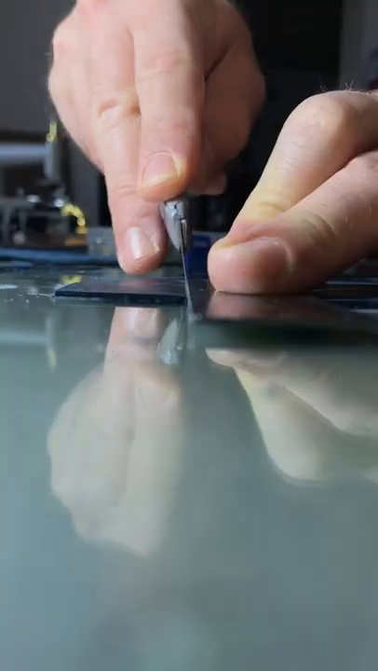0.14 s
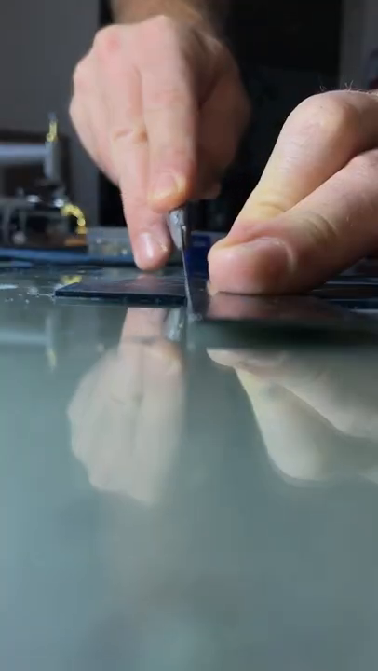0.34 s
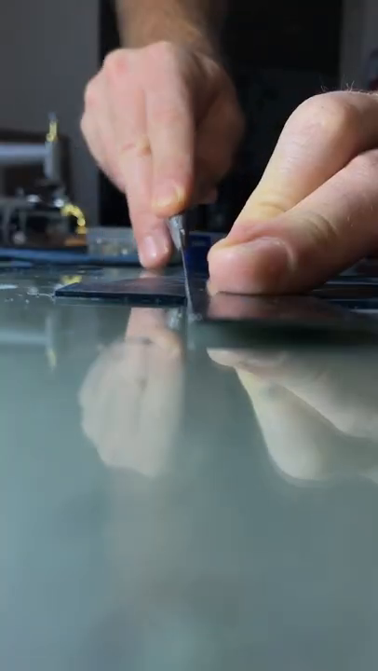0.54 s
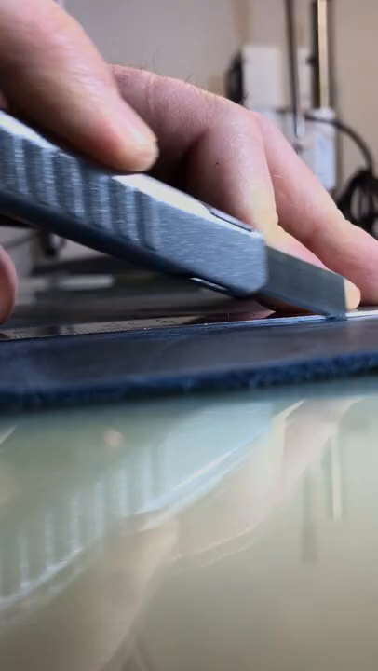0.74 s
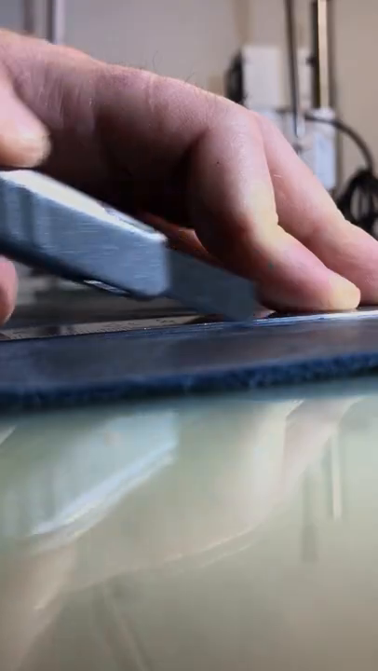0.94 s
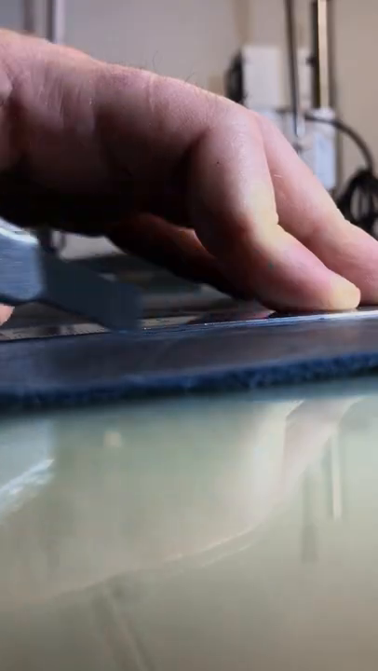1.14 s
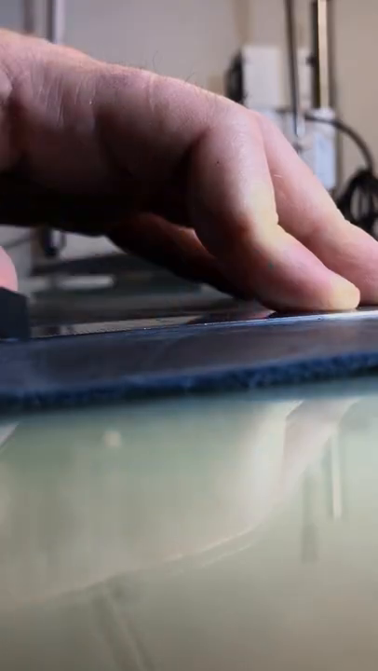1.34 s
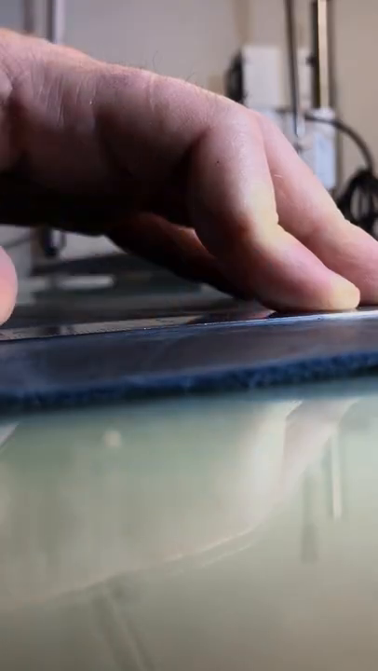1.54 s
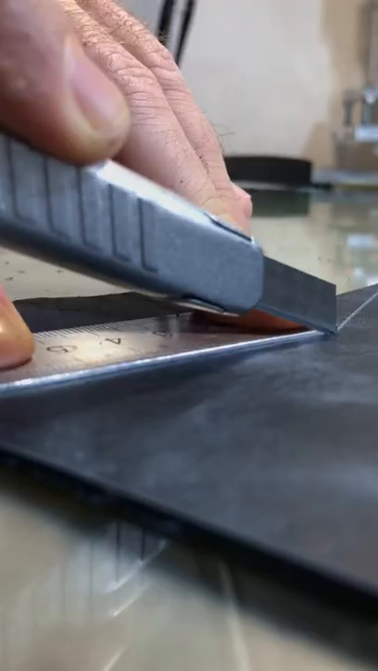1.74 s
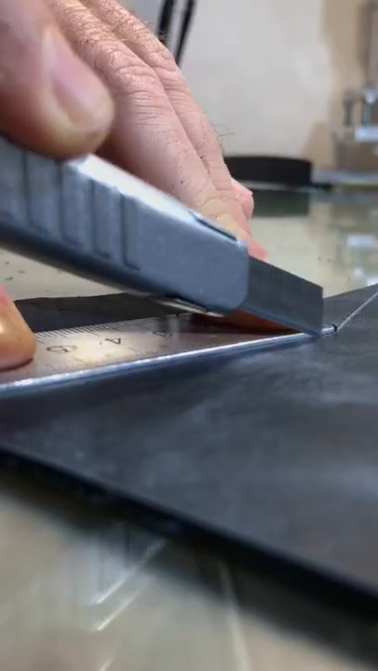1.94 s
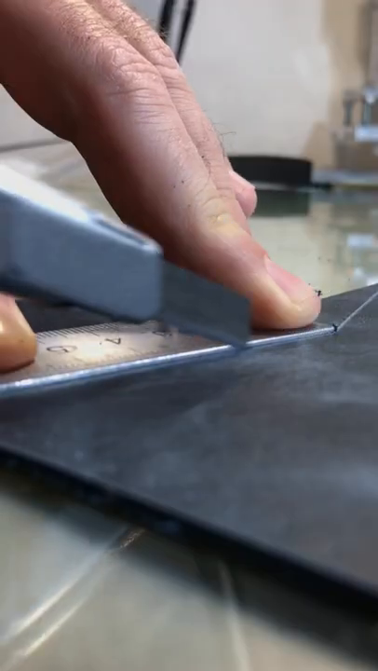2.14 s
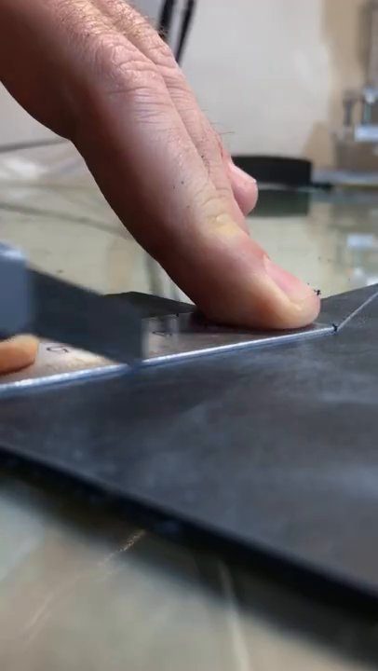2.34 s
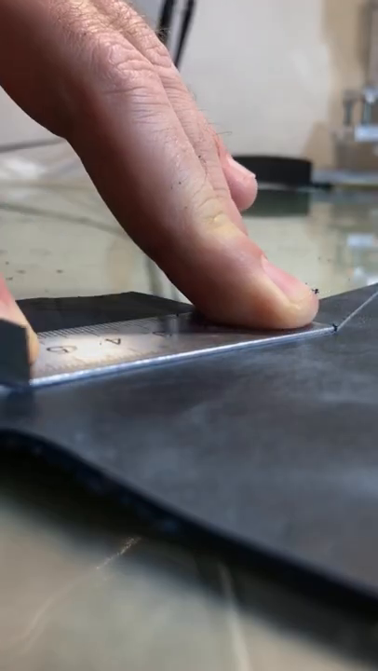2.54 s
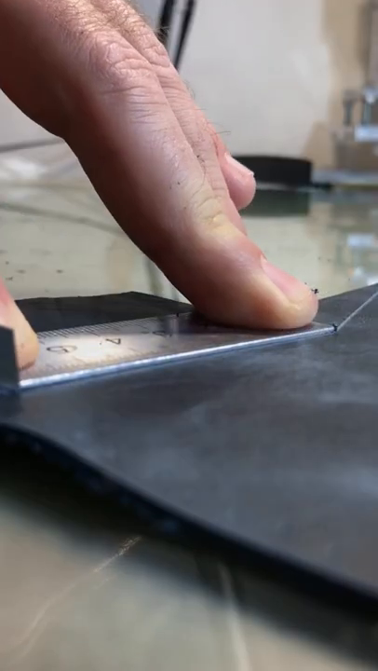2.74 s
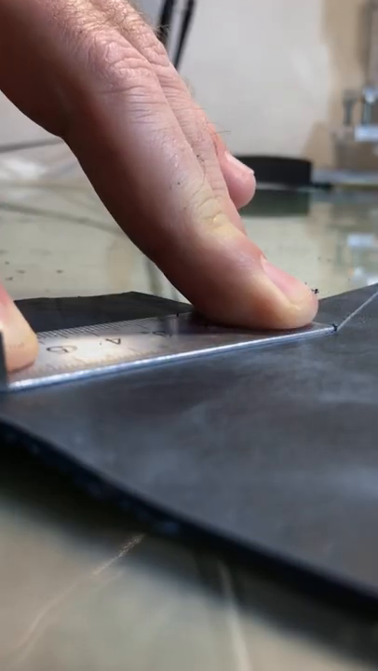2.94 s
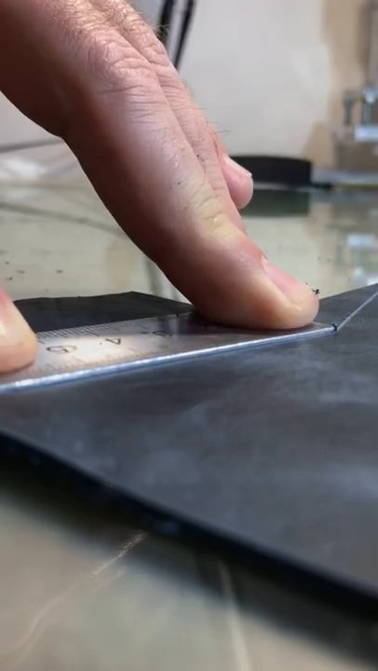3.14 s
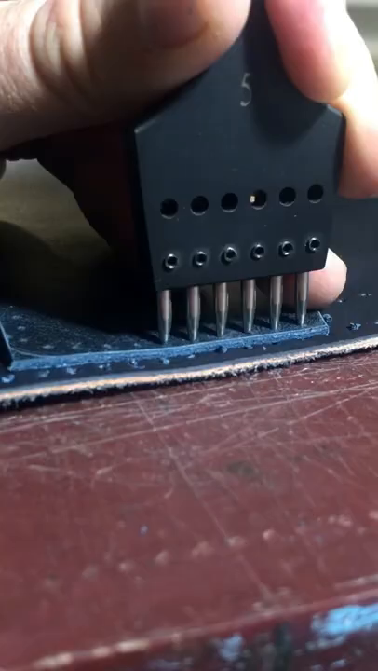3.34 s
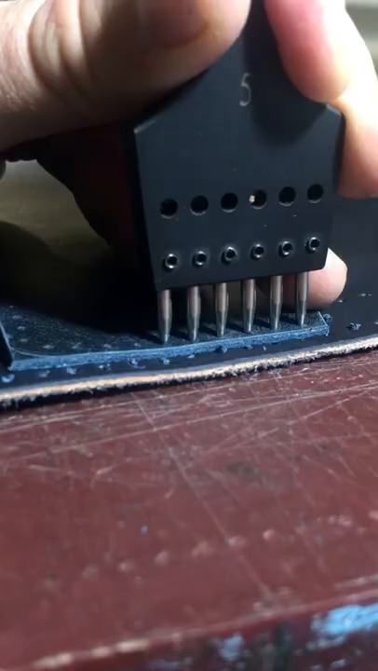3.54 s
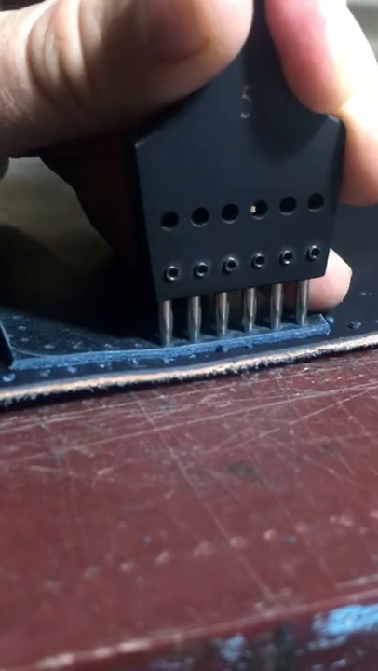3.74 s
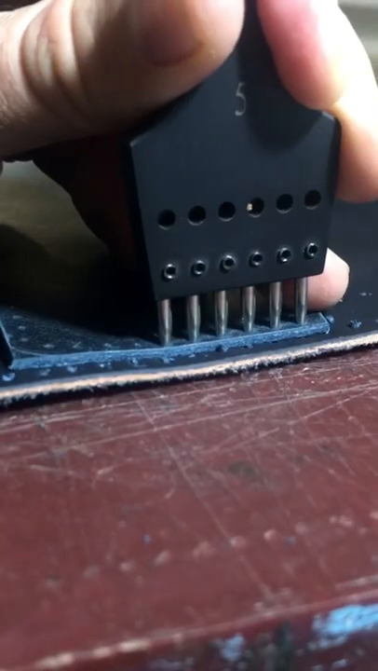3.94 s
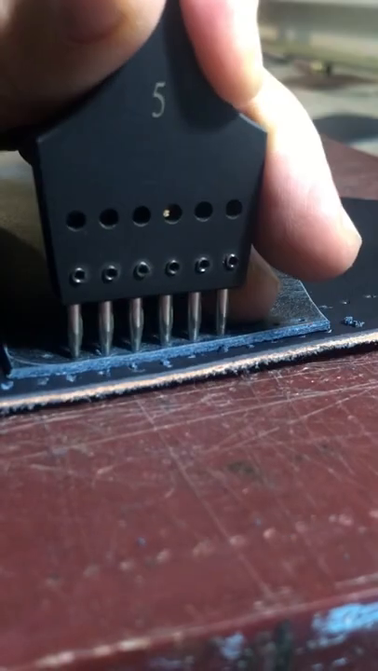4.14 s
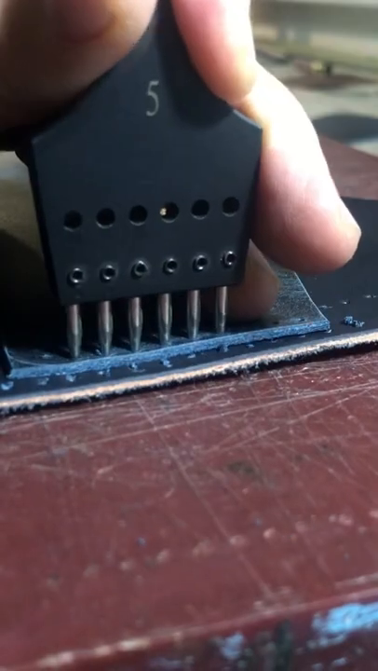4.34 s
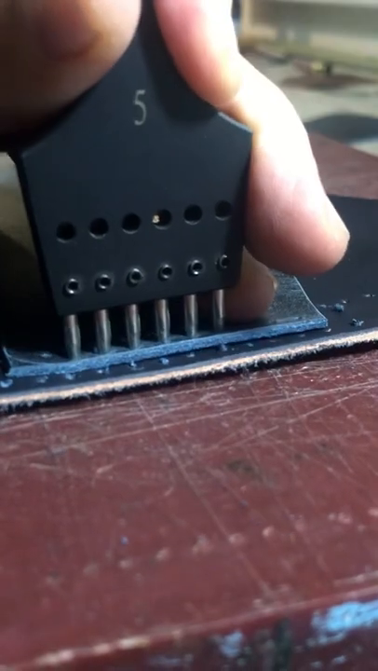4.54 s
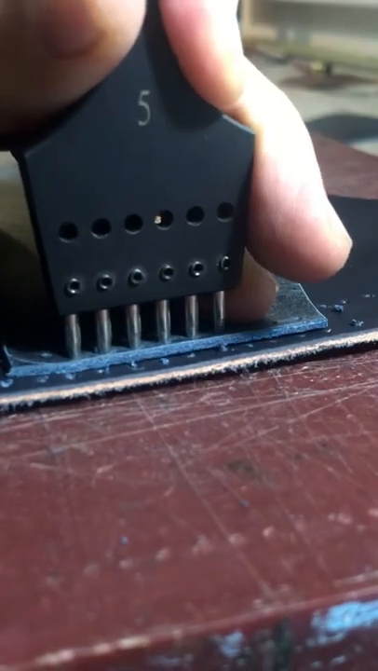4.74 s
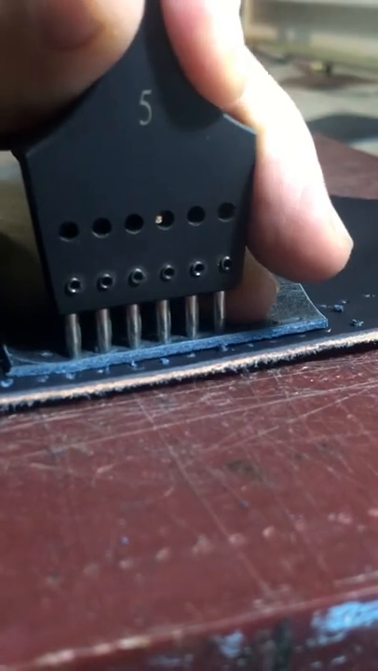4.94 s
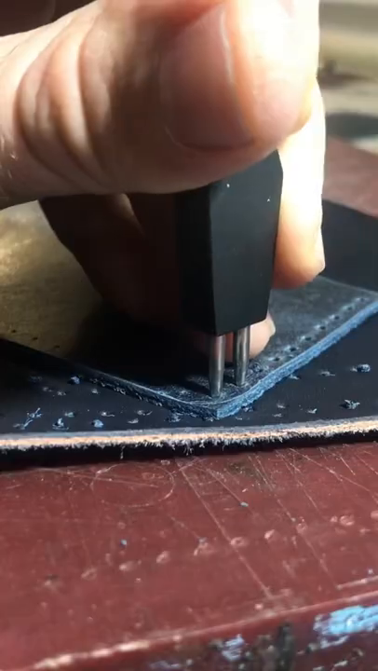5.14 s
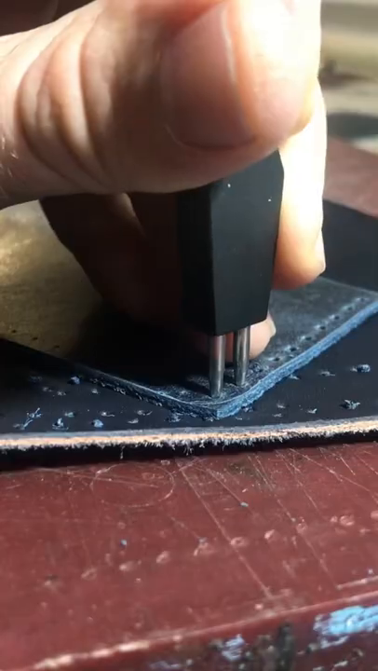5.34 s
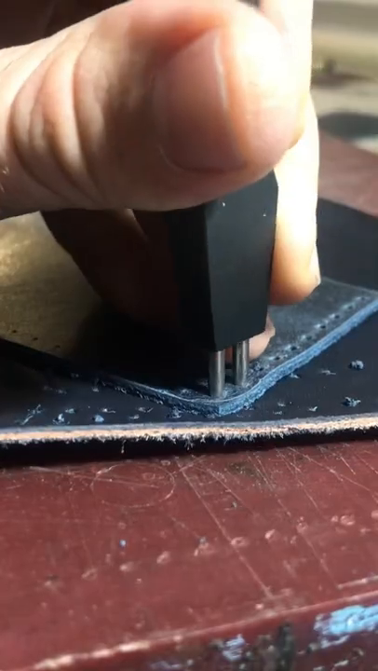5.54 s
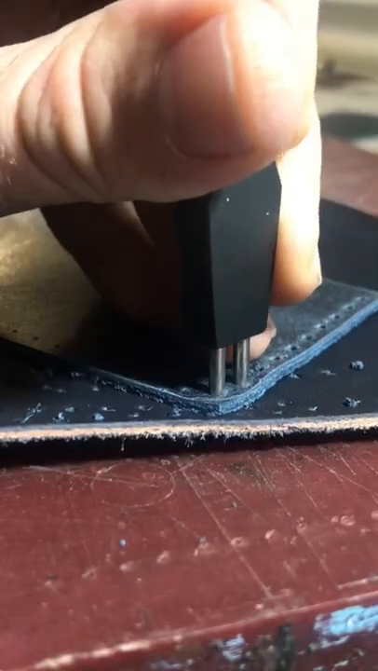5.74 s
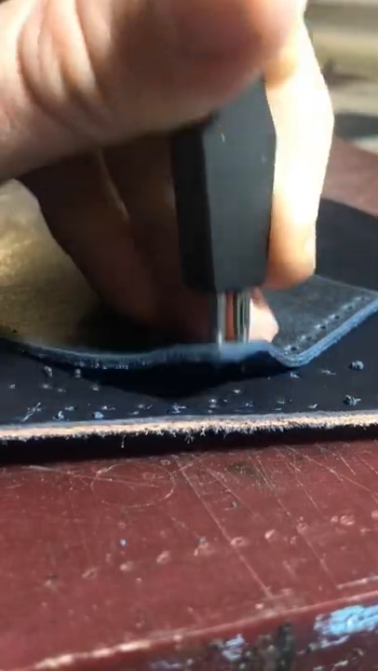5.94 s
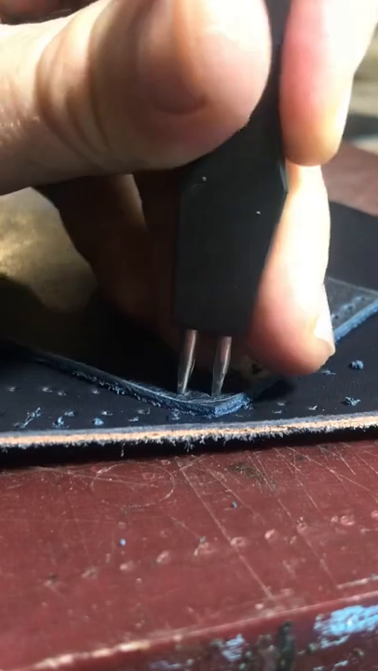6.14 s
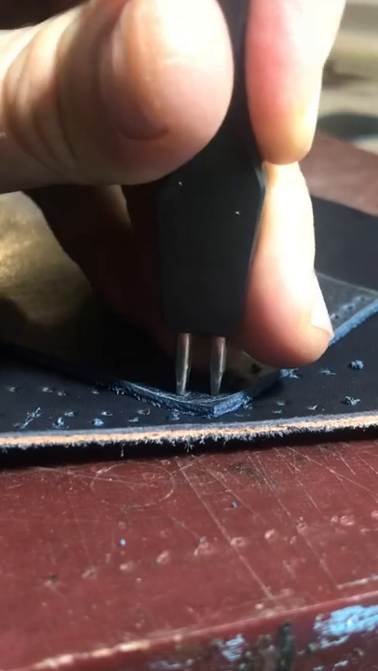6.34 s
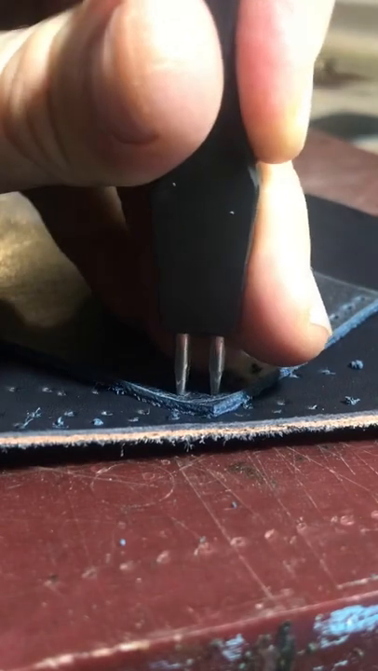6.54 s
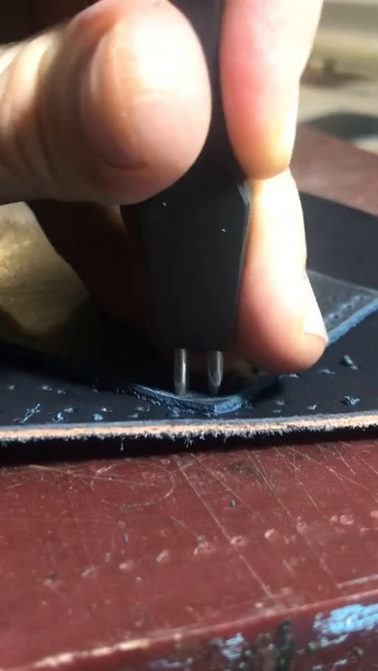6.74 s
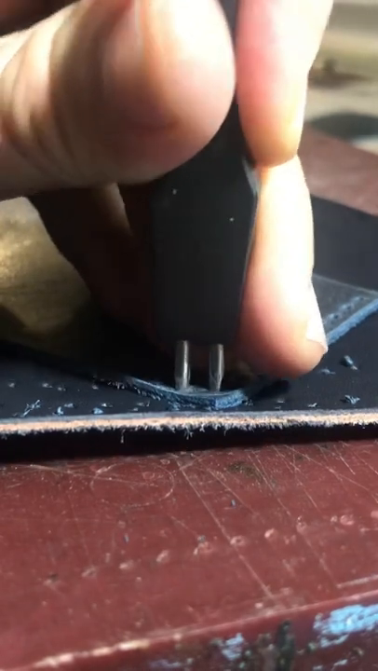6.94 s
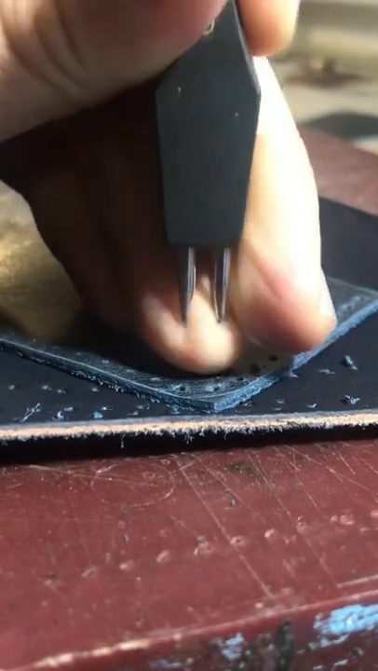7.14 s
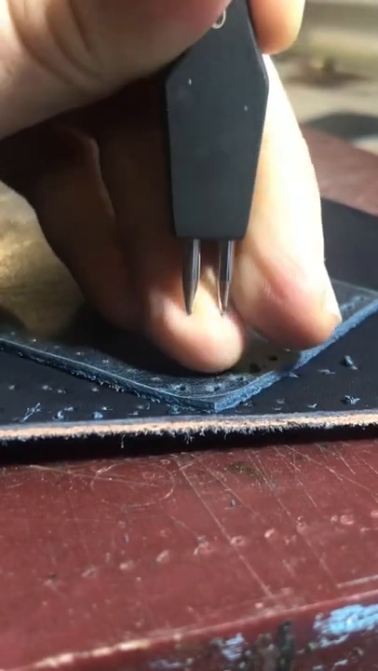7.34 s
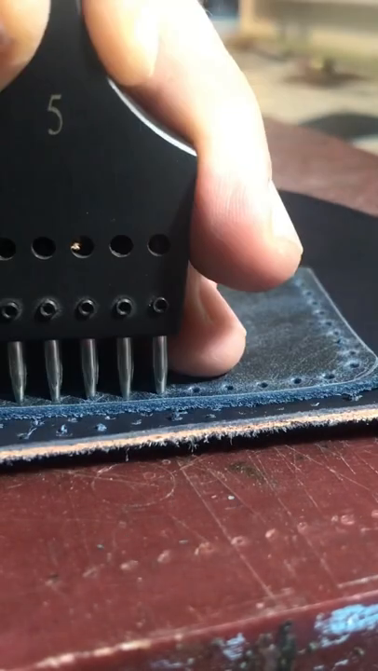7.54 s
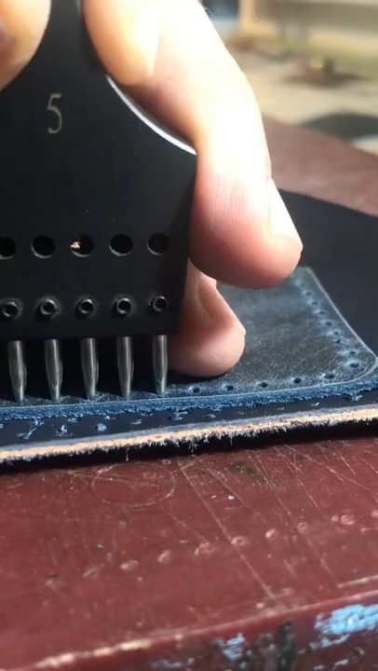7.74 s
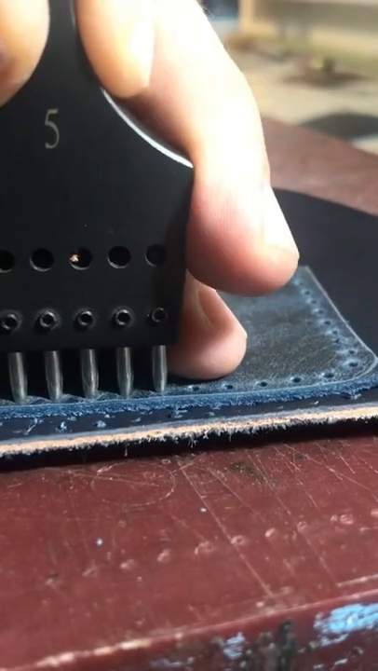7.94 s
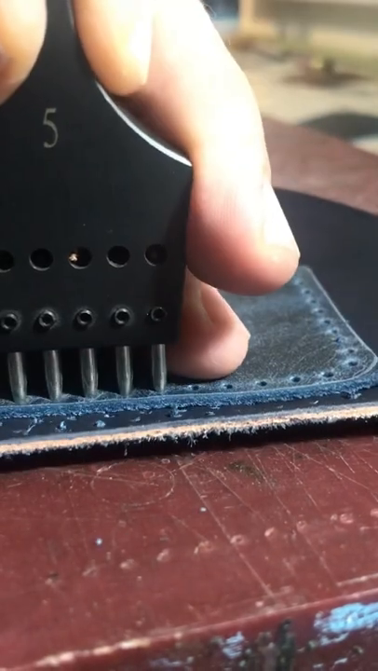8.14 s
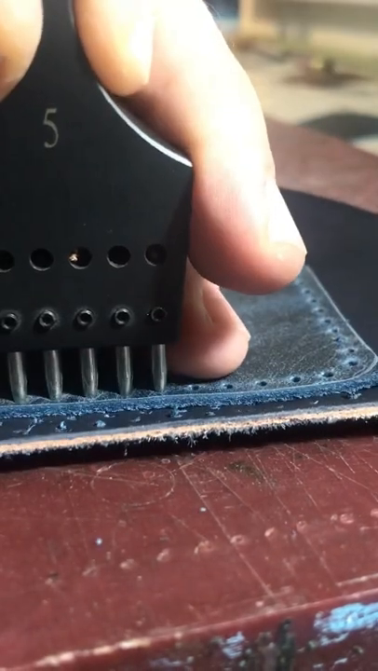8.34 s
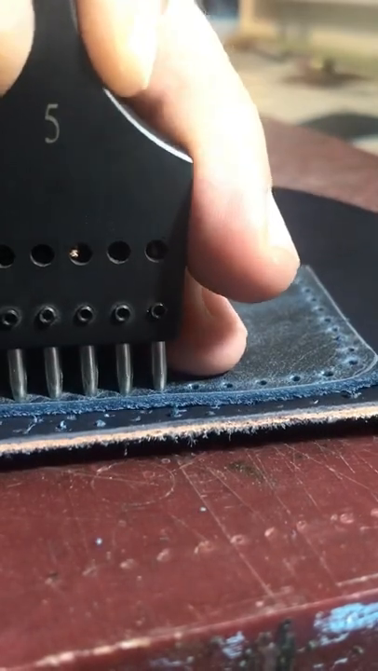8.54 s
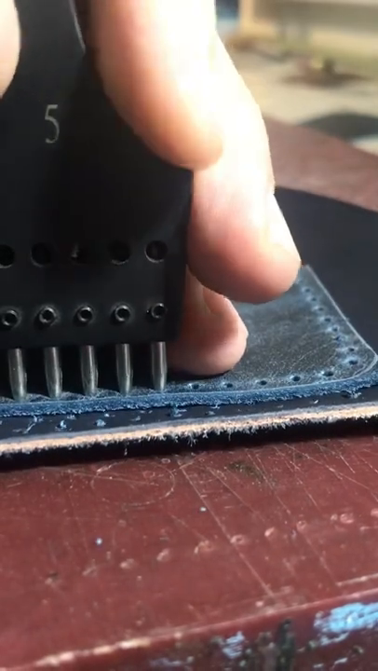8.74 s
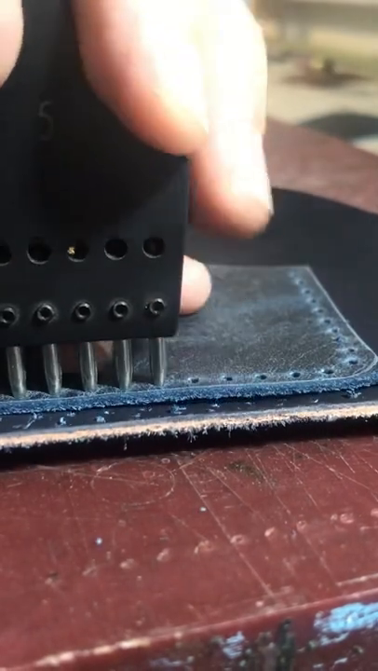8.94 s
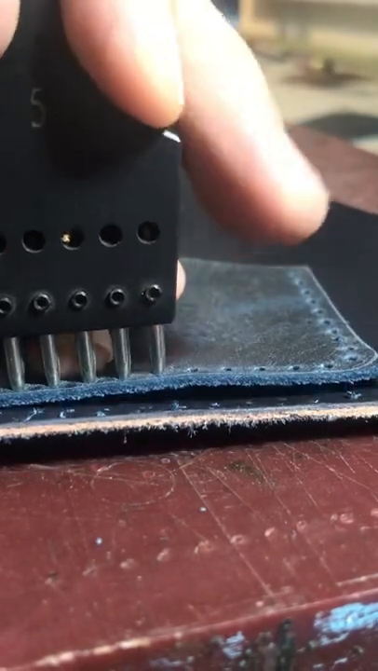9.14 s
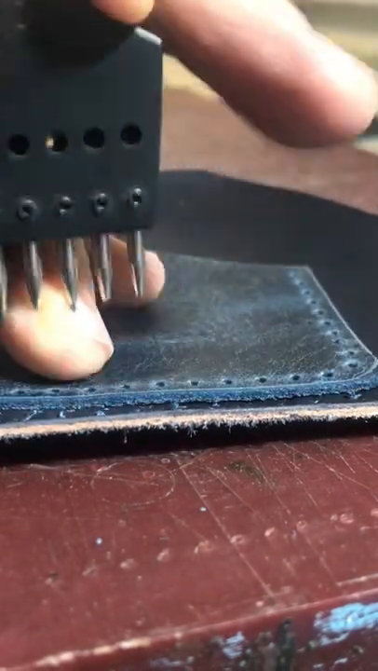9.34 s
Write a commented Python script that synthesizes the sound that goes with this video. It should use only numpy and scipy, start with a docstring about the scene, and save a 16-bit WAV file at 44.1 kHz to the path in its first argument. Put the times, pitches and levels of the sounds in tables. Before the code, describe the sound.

A close microphone in a small workshop, with faint hiss, low rumble and tiny ticks. From 0 to 0.6 s a knife rasps through leather along a steel ruler, with a sharp knock near 0.45 s. A second, brighter, hissier stroke runs from 0.6 to 1.6 s, with a faint low hum of rubbing near 1.2 s. After a brief lull, a third gritty scrape lasts from about 1.9 to 2.6 s. A hard clack follows at 3.0 s, then rustling and a quick double squeak at 3.2 s. Mallet blows on a pronged punch crack and clatter over a resonant wooden bench at 3.6, 4.4, 5.5, 6.7 and 7.8 s, the first two leaving a thin steel ring. Soft thuds and small metallic pops fall between blows, notably at 6.0 and 7.2 s. Echoes stop abruptly at edits. Light touches near 8.5-8.9 s precede a final soft pop at 9.3 s.

```python
"""A knife is drawn three times through leather along a steel ruler on a glass top: grains of snapping fibre
through drifting resonances. Then a mallet drives a pronged punch into leather on a wooden bench, five blows of
noise clatter over dying bench modes; the prongs pop free between them as short rings under a snap. A small
workshop, a close microphone: noise bursts, touches, a squeak, thuds, hums, ticks, whine, hiss, rumble. At a few
set moments the sound breaks off: the echoes and the ringing of the blows stop there, and a new stretch begins."""
import sys
import numpy as np
from scipy import signal
from scipy.fft import rfft, irfft, next_fast_len
from scipy.io import wavfile
from scipy.ndimage import uniform_filter1d

SR = 44100
rng = np.random.default_rng(int(sys.argv[2]) if len(sys.argv) > 2 else 0)


def transcribe(u):
    """Save the signal u as a 16-bit wav file named by the first command-line argument.

    u: samples, shape (n,) or (channels, n), limited to [-1, 1]; the rate is SR.
    q: integer samples, one column per channel.
    """
    v = np.clip(np.atleast_2d(u).T, -1, 1)
    q = np.round(v * 32767).astype(np.int16)
    wavfile.write(sys.argv[1], SR, q)


N = 414099


def amp(db):
    """Decibels to gain."""
    return 10 ** (np.asarray(db) / 20)


def evened(x):
    """Scales to rms 1."""
    return x / np.sqrt(np.mean(x ** 2) + 1e-20)


def smooth_noise(shape, *widths):
    """Slow noise of rms 1: white noise averaged over each width in turn."""
    noise = rng.standard_normal(shape)
    for axis, width in widths:
        noise = uniform_filter1d(noise, width, axis)
    return evened(noise)


def read(points, hz):
    """Reads a table of (pitch_hz, value) on a log-frequency axis."""
    f, value = np.transpose(points)
    return np.interp(np.log(hz + 1), np.log(f + 1), value)


def add(mix, start_s, sound):
    """Mixes a sound in at start_s, cut where the mix ends."""
    part = mix[round(start_s * SR):][:len(sound)]
    part += sound[:len(part)]


def colour(x, points):
    """Filters by a table of (pitch_hz, level_db)."""
    size = next_fast_len(len(x) + 2048)
    return irfft(rfft(x, size) * amp(read(points, np.fft.rfftfreq(size, 1 / SR))), size)[:len(x)]


def modes(table, seconds, waver_db=0):
    """Dying sines of random phase, each wavering in level."""
    t = np.arange(round(seconds * SR)) / SR
    knots = np.arange(0, seconds + .1, .035)
    total = np.zeros(len(t))
    for hz, db, t60 in table:
        waver = waver_db * np.interp(t, knots, rng.standard_normal(len(knots)))
        total += amp(db - 60 * t / t60 + waver) * np.sin(2 * np.pi * (hz * t + rng.random()))
    return total


def grit(count, spread_db, clump_db):
    """Dense grains of uneven size that come in clumps."""
    clumps = smooth_noise(count, (0, 250))
    sizes = np.minimum(rng.exponential(1, count), 5)
    return evened(rng.standard_normal(count) * amp(spread_db * sizes + clump_db * clumps))


def glide(from_hz, to_hz, u):
    """Turns completed by a pitch that moves evenly between two values."""
    return np.cumsum(from_hz + (to_hz - from_hz) * u) / SR


# moments at which the echoes break off and a new stretch begins: start_s
STRETCH_STARTS = [0, .593, 1.6, 3.372, 4.22, 5.09, 6.18, 7.4]


def by_stretch(values):
    """One value for each stretch between break-off moments, held sample by sample."""
    return np.take(values, np.searchsorted(STRETCH_STARTS, np.arange(N) / SR, "right") - 1)


# how fast the small workshop swallows each band: pitch_hz, t60_s
ROOM_DECAY = [(60, 0.21), (160, 0.26), (420, 0.55), (1100, 0.39), (2910, 0.3), (7680, 0.22)]


def room_tail(longer=1):
    """Noise whose bands die at their own speed, after a 4 ms gap; energy 1."""
    hz, t, z = signal.stft(rng.standard_normal(SR), SR, nperseg=256)
    t60 = longer * read(ROOM_DECAY, hz)[:, None]
    tail = signal.istft(z * amp(-60 * t / t60), SR, nperseg=256)[1]
    tail = tail * (np.arange(len(tail)) > .004 * SR)
    return tail / np.linalg.norm(tail)


# spectrum of the microphone hiss: pitch_hz, level_db (per Hz)
HISS_COLOUR = [(15, -36), (25, -8), (82, 3.5), (1310, -14), (9930, -26.5), (10800, -25), (15700, -7.5)]
# hiss, one rms level a stretch: level_db
HISS_LEVELS = [-63, -54, -59.5, -66, -66, -66, -66.5, -65.5]
# low room rumble, one rms level a stretch: level_db
RUMBLE_LEVELS = [-53.5, -50, -63, -66, -62, -64, -82.5, -63.5]


def background():
    """Hiss of the microphone, grainy noise, over a low rumble of filtered noise."""
    rumble_colour = [(35, -5.5), (60, -4.0), (130, -16), (300, -18.0), (700, -58.5)]
    rumble = evened(colour(rng.standard_normal(N), rumble_colour))
    hiss = evened(colour(grit(N, 1.3, 0.84), HISS_COLOUR))
    return hiss * amp(by_stretch(HISS_LEVELS)) + rumble * amp(by_stretch(RUMBLE_LEVELS))


# centre of the faint fuzzy whine, one a stretch: pitch_hz
WHINE_PITCHES = [10400, 10050, 9900, 9600, 9600, 9700, 9900, 10260]
WHINE_DB, WHINE_LOWPASS_HZ = -90.5, 110


def whine():
    """Narrow noise carried on a slowly wandering pitch."""
    wander = smooth_noise(N, (0, 9000), (0, 9000))
    angle = 2 * np.pi * np.cumsum(by_stretch(WHINE_PITCHES) + 45 * wander) / SR
    lowpass = signal.butter(2, WHINE_LOWPASS_HZ, fs=SR, output="sos")
    fuzz = signal.sosfilt(lowpass, rng.standard_normal((2, N)))
    return amp(WHINE_DB) * evened(fuzz[0] * np.cos(angle) + fuzz[1] * np.sin(angle))


# the first of each run of faint steady ticks: start_s
TICK_STARTS = [1.661, 3.412, 5.194, 7.4146]
# ticks of each run, before the treble tilt: level_db
TICK_LEVELS = [-43.5, -58.5, -51.5, -52.5]
TICK_PERIOD_S = .10237


def ticks():
    """Single-sample ticks at a steady pace and scattered crackle, tilted to the treble."""
    crackle_db = -72.0 + 2.6 * np.minimum(rng.exponential(1, N), 3)
    out = amp(crackle_db) * (rng.random(N) < 25 / SR)  # about 25 crackles a second
    for start, end, db in zip(TICK_STARTS, TICK_STARTS[1:] + [N / SR], TICK_LEVELS):
        out[(np.arange(start, end, TICK_PERIOD_S) * SR).astype(int)] += amp(db)
    return signal.oaconvolve(out, [1, -2, 1])[:N]


# short rustling bursts of noise, some just ahead of a click: start_s, length_s, level_db, pitch_hz
NOISE_BURSTS = [(2.833, 0.15, -62.5, 4060), (2.954, 0.029, -48, 4400), (3.165, 0.13, -50, 3460),
                (5.924, .016, -66, 5000), (6.011, .02, -64.5, 6000), (8.476, 0.15, -68, 2940),
                (8.846, 0.036, -68, 9000), (8.919, 0.09, -70, 2100), (9.328, 0.037, -54.5, 2500)]


def noise_burst(start_s, seconds, db, pitch_hz):
    """Fine grains in uneven clumps, strongest near one pitch; they swell fast and thin out."""
    count = round(seconds * SR)
    peak = [(pitch_hz / 4, -13), (pitch_hz, 0), (1.5 * pitch_hz, -7), (30000, -13)]
    grains = evened(colour(grit(count, 3.1, 3.9), peak))
    return start_s, amp(db) * grains * np.sin(np.pi * np.linspace(0, 1, count) ** 0.6)


# brief hums of rubbed leather, ruler, bench and prong: start_s, length_s, level_db, from_hz, to_hz
HUMS = [(1.22, 0.21, -48.5, 205, 201), (3.197, 0.082, -50, 506, 569), (4.86, 0.21, -55.5, 283.8, 300),
        (9.343, 0.036, -65, 8400, 8070)]


def hum(start_s, seconds, db, from_hz, to_hz):
    """A gliding tone that swells and fades unevenly."""
    u = np.linspace(0, 1, round(seconds * SR))
    waver_db = 2.5 * np.interp(u, np.linspace(0, 1, 8), rng.standard_normal(8))
    swell = amp(db + waver_db) * np.sin(np.pi * u ** 0.85)
    return start_s, swell * np.sin(2 * np.pi * glide(from_hz, to_hz, u))


# the ruler squeaks off the glass in two jerks:
# start_s, length_s, level_db, slips_from_hz, slips_to_hz, noise_share (0-1)
SQUEAKS = [(3.194, .022, -29.5, 480, 603, 0.578), (3.21, .026, -39.5, 511, 552.5, 0.12)]
# what the ruler rings with: pitch_hz, level_db
RULER = [(1300, -12), (2090, -7.5), (3060, -3.5), (4450, 0.5), (5500, 4.5), (6900, -6.5), (8540, 5),
         (13800, 4.5)]
RULER_T60_S = .0045  # held down by the fingers


def squeak(start_s, seconds, db, from_hz, to_hz, noise_share):
    """Quick slips of uneven size among scraping noise ring the ruler, speeding up through the jerk."""
    u = np.linspace(0, 1, round(seconds * SR))
    steps = np.diff(np.floor(glide(from_hz, to_hz, u)), prepend=0)  # one per slip
    slips = evened(steps * amp(2.55 * rng.standard_normal(len(u))))
    scrape = grit(len(u), 1.58, 1.5)
    swell = np.sin(np.pi * u ** 0.96) ** 0.77
    drive = ((1 - noise_share) * slips + noise_share * scrape) * swell
    ring = modes([(*row, RULER_T60_S) for row in RULER], 0.00965)
    return start_s, amp(db) * evened(signal.fftconvolve(drive, ring))


# sharp knocks and pops of tools slipping off, rebounding or pulling free:
# start_s, level_db, pitch_hz, snap_db (broad snap), second_db (second ring)
CLICKS = [(0.456, -8, 833, -8, -11), (2.9783, 3, 845, -7.5, -30), (3.624, -7, 2710, -15.5, -12.5),
          (3.689, -7.5, 1250, -28, -6), (4.44, -10.5, 2055, -17, 4.5), (5.393, -40, 5020, -10, 11.5),
          (6.038, -12, 4530, -4, -4), (6.613, -36.5, 4340, -11.5, -10.5), (7.1784, -8.5, 3160, -4.5, -2.5),
          (9.339, -19, 2650, -10, -7.5)]
# faint touches of steel on steel or leather: start_s, level_db, pitch_hz
TOUCHES = [(2.908, -42, 3160), (3.189, -22.5, 5470), (3.446, -47, 2520), (4.325, -41, 3060),
           (6.606, -51.5, 5980), (7.019, -45.5, 2570), (8.497, -41, 3370), (8.657, -47, 3220),
           (8.819, -47.5, 3320), (8.926, -49, 2160)]
# faint short ticks just ahead of each blow: ahead_s, level_db (against the blow), pitch_hz
LEADS = [(.0222, -26, 1200), (0.011, -30, 700)]
FAINT_SNAP_DB = -8  # broad snap of touches and lead ticks
KNOCK_DB, KNOCK_HZ, KNOCK_SNAP_DB = 3.5, 1106, -5  # mallet face meets punch; level against the blow
PLAIN_RING_DB = -16  # second ring of touches, lead ticks and mallet knocks
OVERTONE = 1.2  # pitch of the second ring over the first
POP_LEAD = 400  # samples before the centre of a pop


def click(db, pitch_hz, snap_db, second_db=PLAIN_RING_DB):
    """Two brief rings under a sharp snap and chatter; the walls get a pop, purer if the second ring is weak."""
    t = np.arange(1500) / SR
    chatter = amp(snap_db - 1.0 - 60 * t / 0.009) * rng.standard_normal(len(t))
    first = np.sin(2 * np.pi * pitch_hz * t)
    second = amp(second_db) * np.sin(2 * np.pi * OVERTONE * pitch_hz * t)
    onset = 1 - np.exp(-(t * pitch_hz / 0.9) ** 2)
    knock = amp(-60 * t / (.0003 + 7.5 / pitch_hz)) * (first + second) * onset
    knock[round(SR / pitch_hz)] += amp(snap_db + 8)  # the sharp snap
    soft = [(pitch_hz / 6, -10), (pitch_hz, 0), (16000, -8)]  # strongest at the ring
    close = amp(db) * colour(knock + chatter, soft)
    skirt_db = min(0.4 * second_db - 3.5, -5)
    pop_colour = [(pitch_hz / 8, skirt_db - 10), (pitch_hz / 1.9, skirt_db), (pitch_hz, 0),
                  (1.8 * pitch_hz, skirt_db), (17000, skirt_db - 8)]
    pop = colour(signal.unit_impulse(len(t), POP_LEAD), pop_colour)
    return close, evened(pop) * np.std(close)


# the wide punch rings until a finger damps it: start_s, level_db, length_s
PRONG_RINGS = [(3.612, -51, 0.6), (4.383, -50, 0.42)]
# tones of its prongs: pitch_hz, level_db, t60_s
PRONGS = [(3095, -3.5, 4.5), (3250, -8, 1.8)]


def prong_ring(start_s, db, seconds):
    """Slowly dying steel tones, faded smoothly to nothing as the finger damps them."""
    damped = np.cos(np.linspace(0, np.pi / 2, round(seconds * SR))) ** 2
    return start_s, amp(db) * modes(PRONGS, seconds, waver_db=1.5) * damped


# spectrum of the woody clatter: pitch_hz, level_db (per Hz)
BLOW_COLOUR = [(120, -27), (200, 5.5), (423, -6.5), (801, -4), (1410, -11), (2580, -14.5), (5060, -31),
               (15700, -55)]


def wood_clatter(longer, crack_db, dull_hz):
    """A woody burst of noise and its room tail, where loose tools jump on the bench."""
    t = np.arange(round(1.7 * SR)) / SR
    wood = evened(colour(rng.standard_normal(len(t)), BLOW_COLOUR))
    clatter = wood * amp(-1.5 - 60 * t / 0.029) * (1 - np.exp(-t / 0.0012))
    tail = room_tail(longer)
    woody = colour(tail, BLOW_COLOUR)
    rattle = amp(2.2 * smooth_noise(len(tail), (0, 130)))
    add(clatter, 0, amp(-15.5) * rattle * woody / np.std(woody[:1500]))
    add(clatter, 0, amp(crack_db - 9.5) * np.diff(tail, prepend=0))  # the room answers the crack
    return colour(clatter, [(3 * dull_hz, 0), (12 * dull_hz, -20)])  # soft contact dulls it


# main modes of the wooden bench: pitch_hz, level_db, t60_s
BENCH = [(62.4, -6.5, 0.77), (120.2, 1, 0.33), (142.2, -5, 0.6), (229, -6, 0.45), (261, -5.5, 0.55),
         (356.6, -8, 0.47), (580, -3, 0.44), (655, -6.5, 0.52), (793, -8.5, 0.25), (1105, -7.5, 0.3)]
# low tones that linger after a blow: pitch_hz, level_db, t60_s
DRONE = [(121.5, -44, 5.4), (143, -38.5, 5.2), (174, -33.5, 3.4), (288, -44, 12), (398, -48, 8)]
PLANKS_HZ, PLANKS_DB = (505, 2967), -13  # many lesser modes, other ones at each blow; base level
PLANKS_T60_S = .26  # longest at the lowest pitch, half of it at the highest, before the tail factor


def bench_lows(longer, boom_db, drone_db, dull_hz):
    """A sagging boom, bench modes and drone; a soft contact wakes only the low modes."""
    t = np.arange(round(1.7 * SR)) / SR
    turns = 90 * t + 0.49 * (1 - np.exp(-t / 0.029)) + 0.95  # pitch sags to 90 Hz
    lows = amp(boom_db + 7.5 - 60 * t / 0.08) * np.sin(2 * np.pi * turns)
    place, size, damping = rng.random((3, 24))
    low_hz, high_hz = PLANKS_HZ
    planks = zip(low_hz * (high_hz / low_hz) ** place,
                 PLANKS_DB - 9 * place + 8 * size,
                 longer * PLANKS_T60_S * (1 - place / 2) * (.5 + damping / 2))
    woken = [(hz, level - 20 * np.log10(1 + (hz / dull_hz) ** 3), t60)
             for hz, level, t60 in BENCH + list(planks)]
    add(lows, 0, amp(drone_db) * modes(DRONE, 1.7, waver_db=2.5))
    add(lows, 0, amp(boom_db - 9.0) * modes(woken[:len(BENCH)], 1, waver_db=3.5))
    add(lows, 0, amp(boom_db) * modes(woken[len(BENCH):], 0.64))
    return lows * (1 - np.exp(-t / 0.00078))


# soft thuds on the bench: start_s, level_db, boom_db
THUDS = [(3.372, -61, 5), (4.123, -44, -2), (5.145, -43, 7.5), (7.406, -55.5, 7)]
THUD_CRACK_DB, THUD_DRONE_DB, THUD_DULL_HZ = -30, -6.5, 260
# mallet blows: start_s, level_db, crack_db, longer (tail length against the room's), boom_db
BLOWS = [(3.615, -9, 2.5, 1.146, -6.5), (4.395, -7.5, -3, 1.104, -7), (5.486, -13, 5.5, 1.02, -7),
         (6.7075, -13, 7.5, 0.98, -7), (7.797, -8.5, -0.5, 1.09, -9)]
BLOW_DRONE_DB, BLOW_DULL_HZ = -9, 5000


def blow(db, crack_db, longer, boom_db, drone_db, dull_hz):
    """A crack of bright noise over a woody clatter that the room prolongs; the bench sounds below."""
    clatter = wood_clatter(longer, crack_db, dull_hz)
    t = np.arange(len(clatter)) / SR
    bright = np.diff(rng.standard_normal(len(t) + 1))
    crack = bright * amp(crack_db - 9.0 - 60 * t / 0.00083)
    return amp(db) * (clatter + crack + bench_lows(longer, boom_db, drone_db, dull_hz))


# one curve a knife stroke: start_s, level_db (blade pressure), treble_db (against the pressure)
STROKES = [
    [(0, -48, -4), (.12, -45.5, -1.5), (.22, -38.5, -5.5), (.33, -43, -0.5), (.455, -46, 2.5),
     (.475, -51.5, -2), (.59, -62.5, -5)],
    [(.593, -49, 8), (.85, -46.5, 6.5), (.96, -47.5, 12), (1.22, -46.5, 10.5), (1.45, -53, 5.5),
     (1.56, -49, 13), (1.6, -54, 8)],
    [(1.83, -75, -4), (1.96, -51.5, -1), (2.32, -48, 2.5), (2.47, -49, 4), (2.56, -57, 2), (2.64, -86, 3)],
]
# spectrum of each stroke: pitch_hz, level_db (per Hz)
STROKE_COLOURS = [
    [(24, -63), (40, -5), (71, -17), (175, -8), (1920, -5), (2530, -1), (7800, -16), (10000, -9),
     (15700, -9.5)],
    [(24, -17), (40, -9), (208, -1), (580, -12), (887, -1), (1700, -10.5), (2600, -8), (8620, -17.5),
     (15700, -5.5)],
    [(24, -31), (40, 8.5), (203, 0), (580, -8), (980, 1), (1430, -7.5), (3870, 1), (7800, -10.5),
     (9290, -2), (10500, -16.5), (15700, -11)],
]
# how much the glass rumbles under each stroke: level_db
GLASS_RUMBLE = [-6.5, -2, -2]
# resonances of blade and ruler: pitch_hz, width_hz, level_db
BLADE = [(910, 110, -3.5), (4460, 24, 6), (9920, 130, 0.5), (11940, 88, 2), (14650, 120, 11.5)]
STREAK_RISE_HZ_PER_S = 900  # fleeting rings climb as the free edge shortens


def stroke(rows, points, rumble_db):
    """Fibres snap under the edge; the blade's resonances flicker and drift as grip and angle change."""
    s, *columns = np.transpose(rows)
    count = round((s[-1] - s[0]) * SR)
    hz, t, z = signal.stft(grit(count, 3.2, 1.3), SR, nperseg=512, noverlap=384)
    level_db, treble_db = (np.interp(t + s[0], s, c) for c in columns)
    rings = sum(amp(db) ** 2 / (1 + (2 * (hz - f) / w) ** 2) for f, w, db in BLADE)
    shape = amp(read(points, hz)) * np.sqrt(1 + rings)
    patches = smooth_noise(z.shape, (0, 8), (1, 20))
    streaks = smooth_noise(z.shape, (0, 2), (1, 50))  # fleeting rings
    rise = np.round(STREAK_RISE_HZ_PER_S * t / hz[1]).astype(int)  # in frequency bins
    climbed = np.arange(len(hz))[:, None] - rise
    streaks = np.take_along_axis(streaks, climbed % len(hz), axis=0)
    low = 1 / (1 + (hz / 1200) ** 8)
    high = 1 / (1 + (10500 / (hz + 1)) ** 12)
    field = 0
    for band, extra_db in ((1 - low - high, 0), (high, treble_db), (low, rumble_db)):
        part = shape * band
        field = field + np.outer(part / np.sqrt(np.mean(part ** 2)), amp(level_db + extra_db))
    field = field * amp(1.8 * patches + 3.4 * streaks)
    return s[0], signal.istft(z * field, SR, nperseg=512, noverlap=384)[1][:count]


def scene():
    """Places every sound; echoes, and the ringing of blows and thuds, stop at the end of their stretch."""
    edges = [round(s * SR) for s in STRETCH_STARTS] + [N]
    near, knocked, pops, strokes, blows, echo = np.zeros((6, N))
    for row in NOISE_BURSTS:
        add(near, *noise_burst(*row))
    for row in HUMS:
        add(blows, *hum(*row))
    for row in SQUEAKS:
        add(near, *squeak(*row))
    leads = [(s - ahead, db + lead_db, hz, FAINT_SNAP_DB)
             for s, db, *_ in BLOWS for ahead, lead_db, hz in LEADS]
    knocks = [(s + 0.0013, db + KNOCK_DB, KNOCK_HZ, KNOCK_SNAP_DB) for s, db, *_ in BLOWS]
    touches = [(*row, FAINT_SNAP_DB) for row in TOUCHES]
    for start_s, *settings in CLICKS + leads + knocks + touches:
        close, pop = click(*settings)
        add(knocked, start_s, close)
        add(pops, start_s - POP_LEAD / SR, pop)
    for row in PRONG_RINGS:
        add(blows, *prong_ring(*row))
    soft = [(s, db, THUD_CRACK_DB, 1, boom_db, THUD_DRONE_DB, THUD_DULL_HZ) for s, db, boom_db in THUDS]
    hard = [(*row, BLOW_DRONE_DB, BLOW_DULL_HZ) for row in BLOWS]
    for start_s, *settings in soft + hard:
        end = min(e for e in edges if e > start_s * SR)
        add(blows[:end], start_s, blow(*settings))
    for row in zip(STROKES, STROKE_COLOURS, GLASS_RUMBLE):
        add(strokes, *stroke(*row))
    send = amp(-10.0) * near + amp(-12.0) * pops + amp(-4.0) * strokes
    # the walls swallow some treble
    send = colour(send, [(100, 5.0), (1500, -3), (3500, -8.5), (9000, -10.0), (15000, -7.5)])
    for a, b in zip(edges, edges[1:]):
        echo[a:b] = signal.fftconvolve(send[a:b], room_tail())[:b - a]
    bed = background() + whine() + ticks()
    return (bed + echo + near + knocked + blows + strokes)[None]


EDGE_HZ = 15780  # upper band limit


def record(dry):
    """The microphone drops the deepest bass and rounds off the highest peaks; then the band limit."""
    thin = signal.sosfilt(signal.butter(3, 46, "high", fs=SR, output="sos"), dry)
    rounded = .55 * np.tanh(thin / .55)
    band_limit = signal.firwin(767, EDGE_HZ, window=("kaiser", 9), fs=SR)
    return signal.oaconvolve(rounded, band_limit[None], "same")


dry = scene()
out = record(dry)
transcribe(out)
```